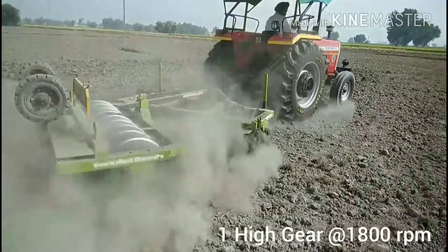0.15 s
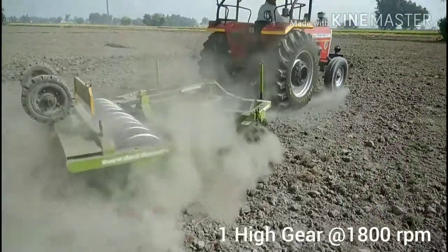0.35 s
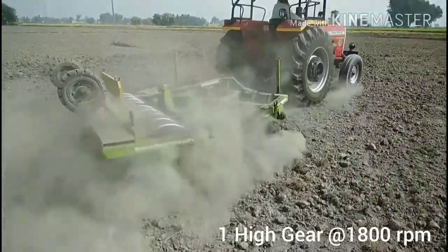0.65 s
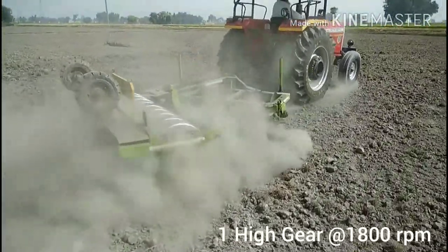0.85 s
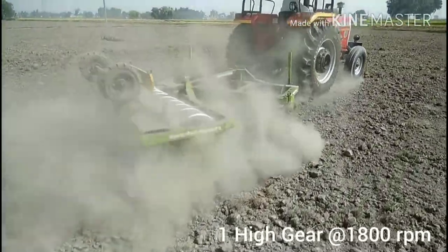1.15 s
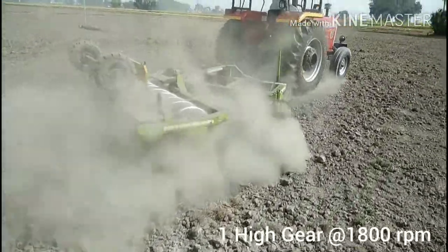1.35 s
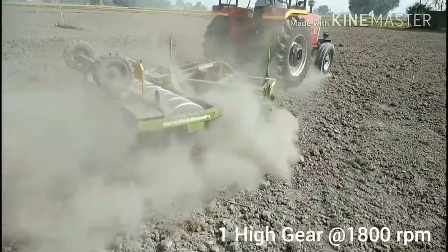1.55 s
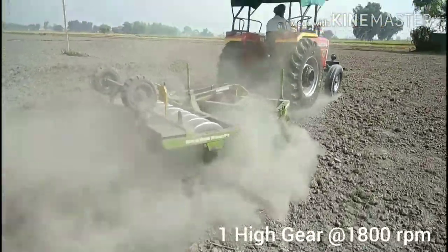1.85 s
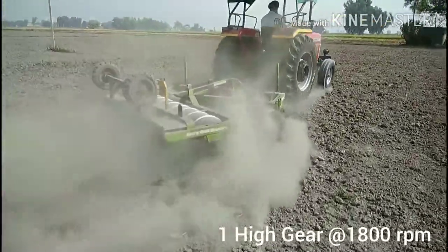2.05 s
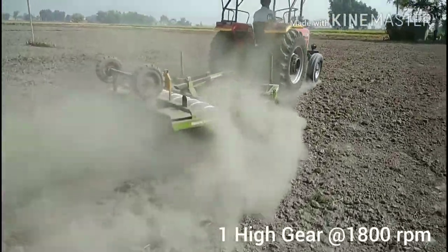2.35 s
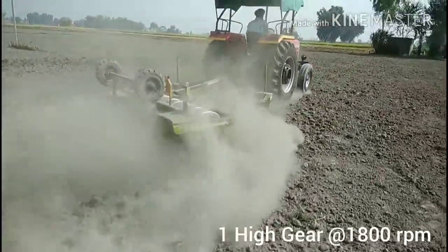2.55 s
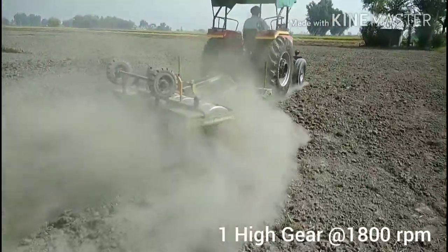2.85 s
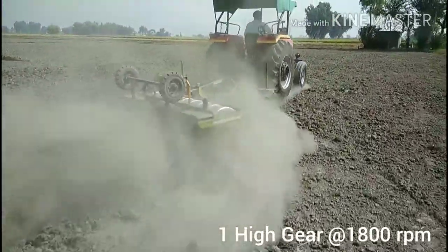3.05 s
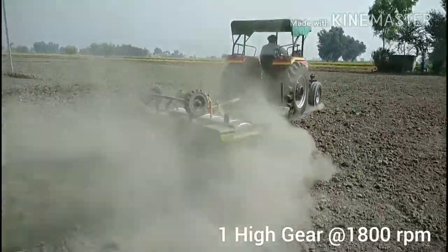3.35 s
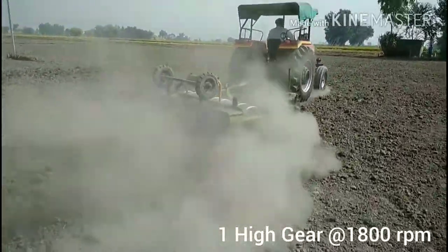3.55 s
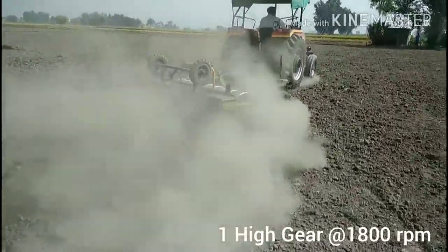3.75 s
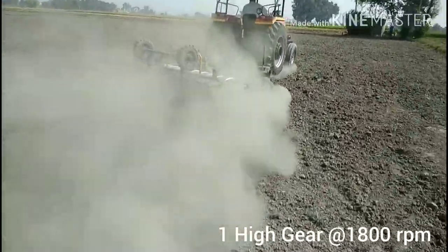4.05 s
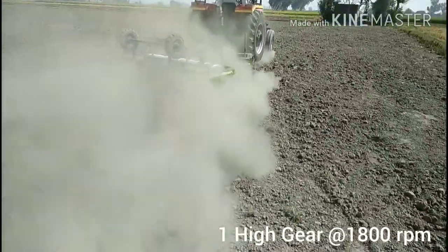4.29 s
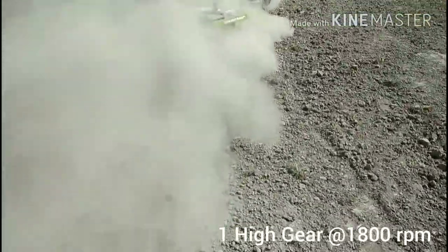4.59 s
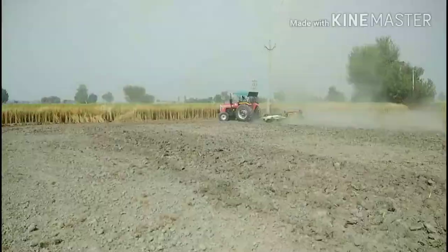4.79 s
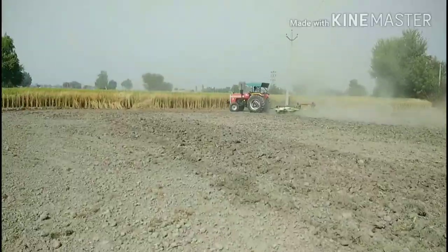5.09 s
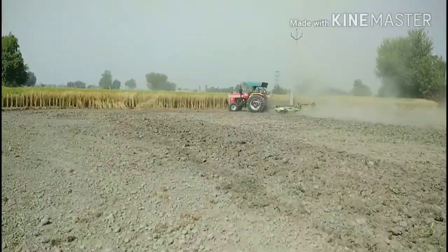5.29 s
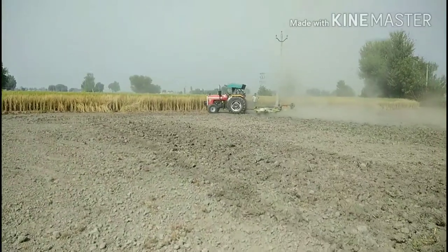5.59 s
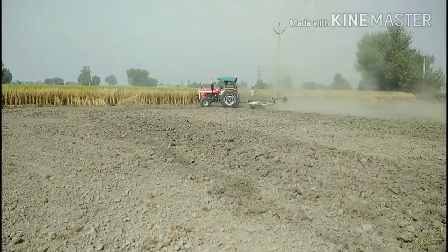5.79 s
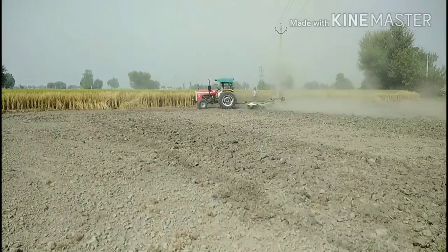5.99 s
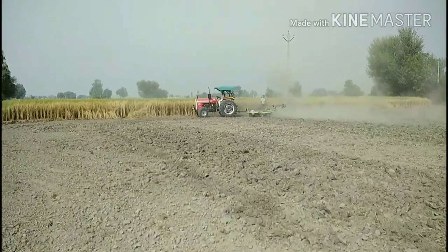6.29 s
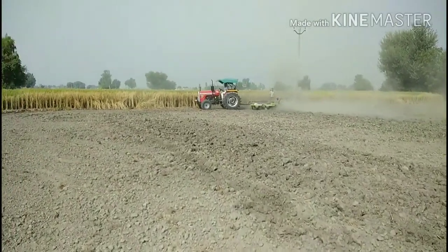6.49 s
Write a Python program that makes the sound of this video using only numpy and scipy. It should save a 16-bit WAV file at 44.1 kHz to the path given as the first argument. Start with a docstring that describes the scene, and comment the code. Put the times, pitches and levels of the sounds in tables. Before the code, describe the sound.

A diesel tractor pulls a disc harrow through a dry field, heard from just behind. The exhaust drones, the gears whine and waver, and the engine clatters, while the discs rumble, crunch through clods and throw a hissing spray of soil. The sound eases as the tractor draws away, then cuts off. After a split second of silence, it returns quieter from across the field, with diesel knocking, faint whine and soil hiss.

```python
"""A diesel tractor drags a disc harrow through dry soil, heard first from just behind, then, after a brief
silence, from across the field. The exhaust drones on the third multiple of the firing rate, loaded gears
whine and waver, and the engine block clatters and sings. The discs rumble in the ground, scrape through
clods, graze stones and throw a hissing spray of crumbs."""
import sys
import numpy as np
from scipy import signal
from scipy.fft import rfft, irfft, next_fast_len
from scipy.io import wavfile
from scipy.ndimage import uniform_filter1d, map_coordinates

SR = 44100
rng = np.random.default_rng(int(sys.argv[2]) if len(sys.argv) > 2 else 0)


def int16_out(signal):
    """Quantize to a 16-bit WAV file."""
    q = np.round(np.clip(np.atleast_2d(signal).T, -1, 1) * 32767)
    wavfile.write(sys.argv[1], SR, q.astype(np.int16))


N = 292383
TIME = np.arange(N) / SR
NEAR_END_S, FAR_START_S = 4.748, 4.776
FIRING_NEAR_HZ, FIRING_FAR_HZ, HUNT_HZ = 54.14, 56.06, 0.11
SAG_HZ, RECOVER_S = 1, 0.2


def firing_rate():
    """Firings a second: the governor hunts a little; the far view opens sagging under load."""
    sag = SAG_HZ * np.exp(-np.maximum(TIME - FAR_START_S, 0) / RECOVER_S)
    return np.where(TIME < NEAR_END_S, FIRING_NEAR_HZ, FIRING_FAR_HZ - sag) + HUNT_HZ * wobble(5.02)


# Exhaust partials, plus a separate low hum near 63 Hz (row 1.16): multiple of the firing rate, level/dB
TONES_NEAR = [(1, -32), (1.16, -24.5), (2, -15.5), (3, 1.5), (3.5, -11.5), (3.75, -23), (4, -10.5),
              (4.5, -16.5), (5, -16), (6.498, -21)]
TONES_FAR = [(1.16, -31), (1.999, -21), (2.5, -20), (3, -2), (3.5, -19.5), (3.999, -24)]
# Drone and hum fader: t/s, level/dB
DRONE_NEAR = [(0, -33), (0.1, -24), (0.33, -22.5), (0.5, -27), (1.15, -25.5), (1.8, -30.5), (2.05, -27),
              (2.3, -31.5), (4.15, -47.5), (4.64, -34), (4.74, -47)]
DRONE_FAR = [(4.85, -36), (5.25, -44), (5.45, -40.5), (5.72, -52), (5.82, -37), (5.98, -44), (6.2, -34.5),
             (6.63, -36)]

def exhaust_and_hum(near_firings, far_firings):
    """Exhaust pulses fuse into a drone, with a separate low hum beneath it: (near, far)."""
    near = fader(DRONE_NEAR) * partials(near_firings, TONES_NEAR, flutter_db=0.5, slip=0.14, rate=11)
    far = fader(DRONE_FAR) * partials(far_firings, TONES_FAR, flutter_db=2.0, slip=0.18, rate=33)
    return near, far


# Load shifting between two gears: t/s, shaft speed/Hz, 15-tooth level/dB, 14-tooth level/dB
GEARS_NEAR = [(0, 50.5, -22, -29), (0.07, 50.4, -25, -29), (0.16, 50.2, -20.5, -29),
              (0.27, 50.57, -24, -33), (0.42, 50.33, -21, -31), (0.54, 50.7, -24, -27),
              (0.62, 50.7, -22, -18), (0.7, 50.2, -20.5, -29), (0.77, 49.94, -23.5, -31),
              (0.84, 50.77, -31, -27), (0.94, 50.97, -21.5, -24), (1.02, 50.67, -24, -20),
              (1.16, 49.8, -23, -35), (1.29, 51.1, -26, -23.5), (1.44, 49.97, -26, -32),
              (1.54, 50.2, -31.5, -33), (1.72, 51.54, -27.5, -26.5), (1.85, 49.24, -21.5, -26.5),
              (1.98, 50.07, -29, -30), (2.12, 50.96, -23, -27), (2.3, 49.76, -25.5, -26),
              (2.44, 51.3, -28.5, -29.5), (2.57, 49.8, -22, -33), (2.76, 50.3, -28.5, -29),
              (2.93, 50.43, -44, -34), (3.01, 50.55, -25.5, -30), (3.12, 50.67, -39, -34),
              (3.24, 49.45, -30.5, -32), (3.38, 50.5, -26.5, -31), (3.48, 51, -33, -39),
              (3.6, 51.4, -35, -33), (3.82, 50.2, -25.5, -34), (3.93, 50.2, -27, -30),
              (4.06, 50.6, -31.5, -38), (4.17, 50.4, -36, -38), (4.3, 50.5, -44, -42),
              (4.42, 50.6, -30, -37), (4.56, 50.5, -48, -43), (4.63, 49.7, -18.5, -31),
              (4.72, 49.9, -54, -50)]
GEARS_FAR = [(4.79, 51.35, -38.5, -34), (4.87, 51.5, -35.5, -37), (4.94, 51.8, -38, -35.5),
             (5.03, 52.4, -49, -47), (5.13, 51.85, -36, -39), (5.22, 50.9, -46, -43), (5.3, 52, -40, -37),
             (5.42, 51.8, -51, -48), (5.52, 52.35, -37, -37), (5.58, 52.3, -40, -45),
             (5.64, 52.6, -42, -37.5), (5.72, 51.7, -38, -38.5), (5.79, 51.8, -47, -50),
             (5.89, 52.25, -43, -32.5), (5.98, 52.7, -50, -54), (6.05, 53, -42, -42),
             (6.13, 52.5, -52, -49), (6.25, 52, -39, -40), (6.34, 51.7, -43, -37), (6.41, 51.8, -51, -49),
             (6.55, 52.3, -43, -41), (6.63, 52.5, -44, -40)]
# Ten-tooth mesh, fading as the tractor draws away: t/s, level/dB
LOW_MESH = [(0, -38.5), (1.75, -39), (1.9, -45), (2.1, -37.5), (2.8, -51), (4.74, -76)]
# Faint gear tones: multiple of the shaft speed, level/dB
TEETH_FAR = [(10, -52), (22, -48.5)]

def gear_whine():
    """Disc drag rocks the drive train; two meshes beat once a turn and throb: (near, far)."""
    shaft_hz, upper_db, lower_db = curves(GEARS_NEAR)
    shaft = np.cumsum(shaft_hz) / SR
    near = partials(shaft, [(15, upper_db), (14, lower_db)], flutter_db=1.6, slip=0.074, rate=25)
    octaves = [(30.03, upper_db - 21.0), (28.05, lower_db - 14.5)]
    near += partials(shaft, octaves, flutter_db=7.5, slip=0.81, rate=27)
    near += fader(LOW_MESH) * partials(shaft, [(10, 0)], flutter_db=5.0, slip=0.56, rate=25)

    shaft_hz, upper_db, lower_db = curves(GEARS_FAR)
    shaft = np.cumsum(shaft_hz) / SR
    far = partials(shaft, [(15, upper_db), (14, lower_db)], flutter_db=1.6, slip=0.28, rate=24)
    far += partials(shaft, [(28, lower_db - 10)], flutter_db=3.5, slip=0.44, rate=17)
    far += partials(shaft, TEETH_FAR, flutter_db=2.5, slip=1.0, rate=17)
    return near, far


# Accents of the four cylinders in firing order: level/dB
CYLINDER_DB = [1.5, -3.5, 0, -2]

def firing_pulse(firings, depth, peak_at, scatter_db):
    """Envelope of one burst per firing, peaking at a fraction of the cycle; each hits differently."""
    strength = amp(scatter_db * rng.uniform(-1, 1, 1024) + np.resize(CYLINDER_DB, 1024))
    age = (firings % 1) / peak_at
    return np.sqrt(1 + depth * strength[firings.astype(int)] ** 2 * age ** 2 * np.exp(2 - 2 * age))


# Clatter EQ: f/Hz, level/dB
BLOCK_NEAR = [(250, -76), (470, -9), (620, -1), (740, 6), (860, 0), (1000, -2.5), (1130, -9.5), (1450, 3),
              (1700, -2.5), (2000, -4.5), (2450, -4), (2750, -17.5), (4000, -24), (9000, -79)]
BLOCK_FAR = [(330, -69), (510, -7.5), (700, -1), (900, -3), (990, -5), (1150, -2.5), (1310, 0.5), (1460, 2),
             (1640, -2.5), (1900, 6), (2150, 0), (2420, -1.5), (2530, -10.5), (2680, -3.5), (3050, -11.5),
             (3220, -6.5), (3480, -5), (3600, -12), (3800, -6.5), (4500, -7.5), (9000, -52)]
# Clatter fader: t/s, level/dB
CLATTER_NEAR = [(0, -26), (1.1, -26.5), (2.3, -28.5), (3.2, -28), (3.6, -27.5), (4.3, -30), (4.74, -30.5)]
CLATTER_FAR = [(4.85, -31.5), (5.06, -33.5), (5.17, -33.5), (5.45, -32.5), (5.9, -32), (6.25, -33.5),
               (6.63, -31.5)]
# Single firings that knock harder: t/s, level/dB
HARD_KNOCKS = [(5.261, -24), (5.404, -21), (5.546, -18), (5.599, -27), (5.813, -23), (5.975, -19),
               (6.078, -19.5), (6.469, -20), (6.524, -21), (6.593, -26)]
# Ring of the block: f/Hz, level/dB, t60/s
BLOCK_MODES = [(1420, -4, 0.019), (1910, -0.5, 0.021), (2350, -7, 0.013), (3540, -5, .008)]

def block_clatter(near_firings, far_firings):
    """Every firing rattles the block; across the field the diesel knock stands out: (near, far)."""
    knock = firing_pulse(near_firings, depth=0.43, peak_at=0.11, scatter_db=7.0)
    near = fader(CLATTER_NEAR) * amp(0.91 * wobble(15)) * rush(BLOCK_NEAR, knock)
    knock = firing_pulse(far_firings, depth=1.24, peak_at=0.25, scatter_db=0.5)
    far = fader(CLATTER_FAR) * hiss(BLOCK_FAR, knock, patchy_db=1.76)
    return near, far + strikes(HARD_KNOCKS, BLOCK_MODES, attack_s=0.00048)


# Metallic engine tones: f/Hz, level/dB
RING_NEAR = [(870, -3), (1417, -3), (1583, -25), (1985, -0.5)]
RING_FAR = [(889, -58), (1270, -50), (1850, -54), (2030, -50), (3445, -59)]
# Swells of the two lead tones in the far view: t/s, high tone level/dB, low tone level/dB
RING_SWELL = [(4.79, -41, -45), (4.9, -37, -40), (5.05, -47, -50), (5.16, -34, -49), (5.28, -45, -52),
              (5.45, -47, -51), (5.55, -43, -42), (5.65, -49, -35), (5.72, -39.5, -43), (5.85, -53, -50),
              (6.0, -47, -46), (6.15, -47, -44), (6.3, -53, -46), (6.45, -46, -42), (6.63, -47, -41)]
RING_HIGH_HZ, RING_LOW_HZ = 1922, 1416

def engine_ring():
    """The engine's metal sings under the clatter, and comes and goes over the field: (near, far)."""
    near = fader(CLATTER_NEAR) * amp(-19.0) * singing(RING_NEAR, flutter_db=6.5, slip=0.95, rate=14)
    high_db, low_db = curves(RING_SWELL)
    lead = singing([(RING_HIGH_HZ, high_db), (RING_LOW_HZ, low_db)], flutter_db=2.0, slip=0.45, rate=20)
    return near, lead + singing(RING_FAR, flutter_db=3.5, slip=0.45, rate=15)


# Clunk cues: t/s, level/dB
CLUNKS = [(3.219, -22), (3.619, -16), (3.932, -24)]
# Ring of the gear housing: f/Hz, level/dB, t60/s
HOUSING_MODES = [(766.4, 11, 0.029), (1522, -14, .018)]

def drive_clunks():
    """The drive train takes up its slack and rings the gear housing."""
    return strikes(CLUNKS, HOUSING_MODES, attack_s=0.0026)


# Rumble and low-mid EQ: f/Hz, level/dB
RUMBLE_NEAR = [(20, -36), (45, -26), (85, -21), (115, -7), (150, -5), (195, -0.5), (260, -4), (340, -9),
               (450, -18), (700, -27), (1500, -80)]
RUMBLE_FAR = [(20, -34), (60, -14), (110, 4.5), (170, 13), (220, 1), (280, -7), (330, -14), (430, -14),
              (700, -22), (1500, -80)]
LOW_MIDS = [(170, -40), (270, -2), (340, -10), (400, -3), (470, 0), (550, -1), (640, -6), (850, -50)]
# Near rumble fade: start level/dB, loss/(dB/s)
RUMBLE_FADE = (-28.5, 0.84)
# Far rumble and low-mid faders: t/s, level/dB
GROUND_FAR = [(4.8, -51), (5.1, -51.5), (5.95, -53), (6.2, -48.5), (6.63, -45)]
LOW_MID_SWELLS = [(4.8, -60), (4.95, -68), (5.1, -66), (5.17, -56), (5.26, -70), (5.5, -62), (5.62, -72),
                  (5.83, -57), (5.96, -70), (6.02, -49.5), (6.1, -52), (6.26, -68), (6.5, -55), (6.63, -63)]

def ground_rumble(near_firings):
    """The discs rumble, chugging up close; far off, soft ground swallows the low mids: (near, far)."""
    chug = firing_pulse(near_firings, depth=1.0, peak_at=0.15, scatter_db=2.0)
    near = receding(*RUMBLE_FADE) * rush(RUMBLE_NEAR, chug * amp(0.54 * wobble(29.84)))
    far = fader(GROUND_FAR) * rush(RUMBLE_FAR, amp(1.2 * wobble(25)))
    far += fader(LOW_MID_SWELLS) * rush(LOW_MIDS, amp(0.8 * wobble(22)))
    return near, far


# EQ of gritty scrape, hard clods, soil hiss and finest spray: f/Hz, level/dB
GRIT = [(1200, -56), (2900, 4), (3800, 1.5), (4700, -1.5), (5800, -0.5), (6800, -3.5), (9000, -2),
        (12000, -35)]
CLODS = [(800, -50), (1550, 4), (1900, 6), (2400, -1), (2900, -9), (6000, -52)]
SOIL_NEAR = [(3000, -21.5), (6000, -13), (7200, -4.5), (8400, -2), (9600, -6.5), (11500, -6.5),
             (15600, -3.5)]
SPRAY = [(7000, -25.5), (10000, -6.5), (11000, -1), (11700, -1.5), (12500, -5), (13600, -8), (16000, -14)]
# Faders for the bite of the discs, a patch of hard clods and the spray: t/s, level/dB
SCRAPE = [(0, -34), (0.7, -32.5), (2.3, -36.5), (2.95, -38), (3.08, -35.5), (3.25, -37.5), (3.45, -37),
          (3.63, -37.5), (3.75, -40.5), (4.74, -40.5)]
CRUNCH = [(0, -58), (2.3, -41.5), (3.2, -42), (3.45, -36.5), (3.63, -31.5), (3.78, -36.5), (4.74, -46)]
SPRAY_NEAR = [(0, -33), (1.5, -35), (2.05, -33.5), (2.3, -35.5), (2.55, -34.5), (2.88, -31.5), (2.98, -35),
              (3.06, -28.5), (3.16, -30), (3.22, -35), (3.35, -33), (3.5, -39), (3.7, -46), (4.35, -39.5),
              (4.5, -36), (4.74, -41)]
# Soil hiss fade: start level/dB, loss/(dB/s)
SOIL_FADE = (-33, 0.065)

def soil_near():
    """Clods burst unevenly on the discs, so scrape, crunch, hiss and spray surge together."""
    surge = amp(0.43 * wobble(6.1) + 0.86 * wobble(36))
    scrape = fader(SCRAPE) * hiss(GRIT, crumbs(per_second=330, size=.28), patchy_db=2.0)
    crunch = fader(CRUNCH) * rush(CLODS, crumbs(per_second=140, size=1.3))
    soil = receding(*SOIL_FADE) * hiss(SOIL_NEAR, crumbs(per_second=710, size=.3), patchy_db=2.0)
    spray = fader(SPRAY_NEAR) * hiss(SPRAY, crumbs(per_second=660, size=.3), patchy_db=2.0)
    return surge * (scrape + crunch + soil + spray)


# Far hiss EQ: f/Hz, level/dB
HISS_EQ_FAR = [(1200, -45), (3000, 2.5), (4300, -1), (5200, 2), (6000, 5.5), (6800, 2), (7600, 8),
               (8500, 5), (9400, 7.5), (10500, 9), (13300, -20), (14300, -6), (15500, -1)]
# Far hiss fader: t/s, level/dB
HISS_FAR = [(4.8, -41), (5.1, -40.5), (5.35, -39.5), (5.5, -38.5), (5.68, -43), (5.73, -38.5), (5.8, -38.5),
            (6.15, -39.5), (6.3, -38.5), (6.63, -37.5)]

def soil_far(firings):
    """Thrown soil hisses across the field, its treble ticking with every firing."""
    ticks = firing_pulse(firings, depth=0.67, peak_at=0.38, scatter_db=8.0)
    ticks *= crumbs(per_second=240, size=.25)
    broad_hiss = hiss(HISS_EQ_FAR, ticks, patchy_db=2.8)
    spray = amp(-3) * hiss(SPRAY, ticks, patchy_db=1.5)
    return fader(HISS_FAR) * (broad_hiss + spray)


# Graze cues, then a disc singing: t/s, level/dB, f/Hz, bandwidth/Hz, half-length/s
STONES = [(3.04, -26.5, 8410, 449, 0.0078), (3.079, -30.5, 3900, 2200, 0.015),
          (3.526, -29.5, 7360, 2400, 0.026), (3.632, -28, 6790, 4200, 0.024),
          (4.048, -36, 3130, 600, 0.015), (4.12, -35.5, 2380, 150, 0.052), (4.443, -41, 2420, 150, 0.067)]

def stones():
    """Stones and hard clods graze a disc, and the disc briefly sings near 2.4 kHz; each is a short swell of
    noise in one of its bands."""
    out = np.zeros((2, N))
    t = np.arange(-SR // 8, SR // 8) / SR
    for s, db, hz, width_hz, half_s in STONES:
        ring = signal.lfilter(*signal.iirpeak(hz, hz / width_hz, SR), rng.standard_normal((2, len(t))))
        out[:, round((s + t[0]) * SR):][:, :len(t)] += amp(db) * unit(ring) * np.exp(-(t / half_s) ** 2)
    return out


def partials(turns, orders, flutter_db, slip, rate):
    """Multiples of a rotation, fluttering in level and slipping in phase (rad), rate times a second."""
    return sum(amp(db + flutter_db * np.sqrt(2) * np.tanh(wobble(rate)))
               * np.sin(2 * np.pi * (k * turns + rng.random()) + slip * wobble(rate))
               for k, db in orders)


def singing(tones, flutter_db, slip, rate):
    """Narrow metallic tones that swell and fade differently on each side."""
    shared = partials(TIME, tones, flutter_db, slip, rate)
    return np.array([1.23 * shared + .5 * partials(TIME, tones, flutter_db, slip, rate) for _ in range(2)])


def strikes(blows, modes, attack_s):
    """Separate blows, each ringing the same modes with a slightly different balance."""
    out = np.zeros(N + SR)
    t = np.arange(SR // 8) / SR
    for s, db in blows:
        ring = sum(amp(level + rng.normal(0, 1) - 60 * t / t60)
                   * np.sin(2 * np.pi * (hz * t + rng.random())) for hz, level, t60 in modes)
        out[round(s * SR):][:len(t)] += amp(db) * ring * (1 - np.exp(-t / attack_s))
    return out[:N]


def crumbs(per_second, size):
    """Envelope of a spray of soil: an even bed with single grains standing out."""
    hits = (rng.random(N) < per_second / SR) * rng.exponential(size=N)
    return 1 + size * np.convolve(hits, np.hanning(48), "same")


def rush(eq, envelope):
    """Stereo noise, pulsed by an envelope and coloured by an EQ."""
    return spread(envelope * rng.standard_normal((2, N)), eq)


def hiss(eq, envelope, patchy_db):
    """Pulsed stereo noise whose colour keeps shifting in small patches."""
    spectra = signal.stft(envelope * rng.standard_normal((2, N)), nperseg=512)[2]
    patches = rng.standard_normal(spectra.shape)
    for _ in range(2):
        patches = uniform_filter1d(uniform_filter1d(patches, size=4, axis=1), size=11, axis=2)
    pair = signal.istft(spectra * amp(patchy_db * unit(patches)), nperseg=512)[1][:, :N]
    return spread(pair, eq)


# Stereo image of the noise: f/Hz, left-right correlation
CORRELATION = [(30, 0.43), (150, 0.91), (750, 0.94), (1400, 0.65), (2200, 0.22), (4000, 0.0072),
               (15000, 0.024)]

def spread(pair, eq):
    """Colour two unrelated signals as mid and side: bass alike, treble apart."""
    def shares(hz):
        angle = np.arccos(along(CORRELATION, hz)) / 2
        return amp(along(eq, hz)) * np.array([np.cos(angle), np.sin(angle)])
    mid, side = filtered(pair, shares)
    return np.array([mid + side, mid - side]) / np.sqrt(np.mean(mid ** 2) + 1e-20)


def panned(x, pan):
    """Tilt the two channels against each other, band by band."""
    return filtered(x, lambda hz: amp(np.outer([1, -1], along(pan, hz)) / 2))


def filtered(x, response):
    """Shape x with a gain that depends on frequency."""
    size = next_fast_len(N + 8192, real=True)
    return irfft(rfft(x, size) * response(np.fft.rfftfreq(size, 1 / SR)), size)[..., :N]


def wobble(rate):
    """A smooth random curve, rate knots a second."""
    coarse = np.arange(0, N + 32, 32)
    knots = rng.standard_normal(2048)
    return np.interp(np.arange(N), coarse, map_coordinates(knots, [coarse * rate / SR], mode="wrap"))


def receding(start_db, loss_db_per_s):
    """Gain of a sound that moves steadily away."""
    return amp(start_db - loss_db_per_s * TIME)


def fader(rows):
    """Gain per sample from (t/s, level/dB) points."""
    return amp(curves(rows)[0])


def curves(rows):
    """One value per sample for each column after the time."""
    s, *columns = np.transpose(rows)
    return [np.interp(TIME, s, column) for column in columns]


def along(points, hz):
    """(f/Hz, value) points read on a log axis."""
    f, values = np.transpose(points)
    return np.interp(np.log(hz + 1), np.log(f + 1), values)


def amp(db):
    """Decibels to gain."""
    return 10 ** (np.asarray(db) / 20)


def unit(x):
    """Scale to rms 1."""
    return x / np.sqrt(np.mean(x ** 2) + 1e-20)


# Pan by band: f/Hz, left minus right/dB
PAN_NEAR = [(150, 1.2), (700, 1.2), (1290, -1.5), (2400, -4), (3600, -3), (4600, 0), (5900, 3), (6900, -4),
            (8300, -6.5), (9700, -3), (11500, 3.5), (15000, -1)]
PAN_FAR = [(150, 2), (380, -8.5), (700, 2.5), (1290, 0.5), (2000, -4), (2600, -13), (3300, -4),
           (4300, -1.5), (6500, 0), (7700, 2), (8900, -2), (11000, 1.5), (14500, 4)]

def scene():
    """The near view stops dead; the far view fades in a moment later."""
    firings = np.cumsum(firing_rate()) / SR
    # a far firing cycle starts on the first hard knock
    far_firings = firings + 1 - firings[round(HARD_KNOCKS[0][0] * SR)] % 1
    near_layers, far_layers = zip(exhaust_and_hum(firings, far_firings), gear_whine(),
                                  block_clatter(firings, far_firings), engine_ring(),
                                  ground_rumble(firings))
    near = panned(sum(near_layers) + drive_clunks() + soil_near(), PAN_NEAR)
    far = panned(sum(far_layers) + soil_far(far_firings), PAN_FAR)
    fade_out = np.clip((NEAR_END_S - TIME) / 0.0057 + .5, 0, 1)
    fade_in = np.clip((TIME - FAR_START_S) / 0.023 + .5, amp(-26.5), 1)
    return fade_out * near + (1 - fade_out) * fade_in * far + stones()


# Shading of the right microphone as it turns: t/s, share of the top treble lost
SHADE = [(1.2, 0.1), (2.2, 0.25), (3.7, 0.79), (4.74, 0.82), (4.78, 0.25)]
TOP_HZ = 15550

def record(dry):
    """The right microphone is partly shaded; nothing passes above the band limit."""
    left, right = dry
    top = filtered(right, lambda hz: np.clip((hz - 11500) / 1500, 0, 1))
    shaded = right - curves(SHADE)[0] * top
    return filtered(np.array([left, shaded]), lambda hz: hz < TOP_HZ)


dry = scene()
out = record(dry)
int16_out(out)
```